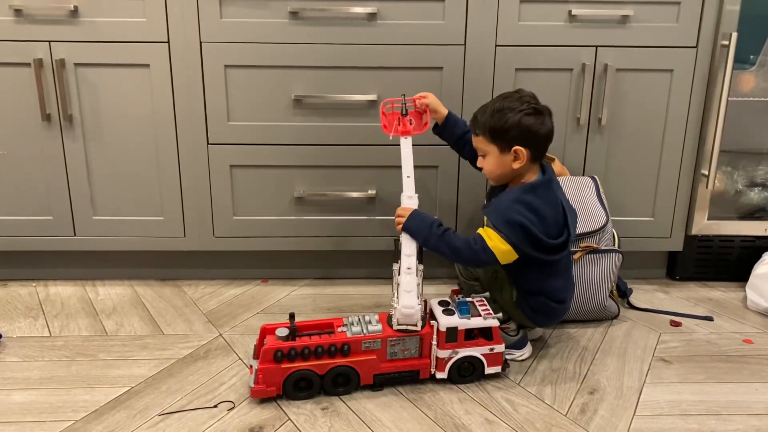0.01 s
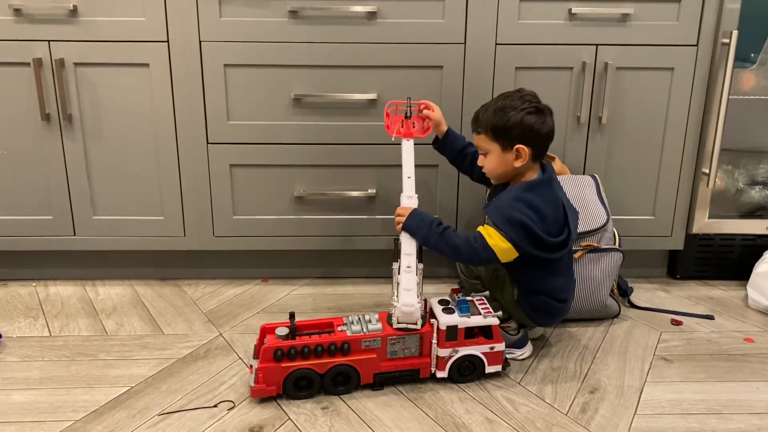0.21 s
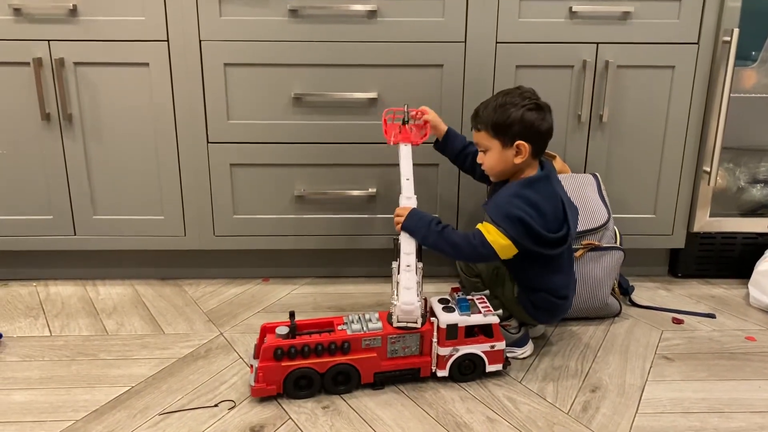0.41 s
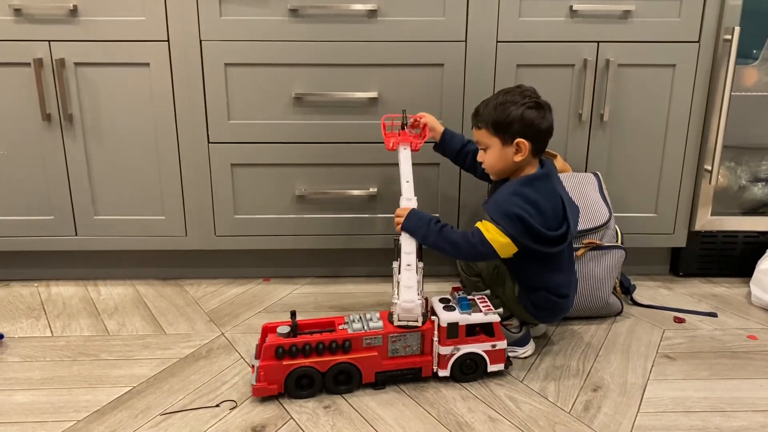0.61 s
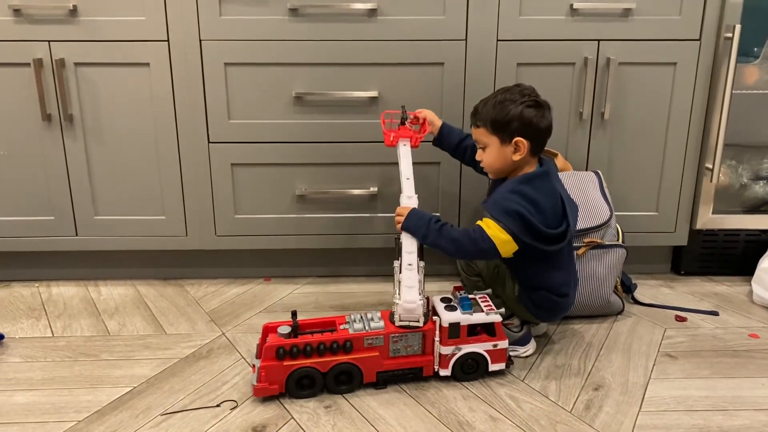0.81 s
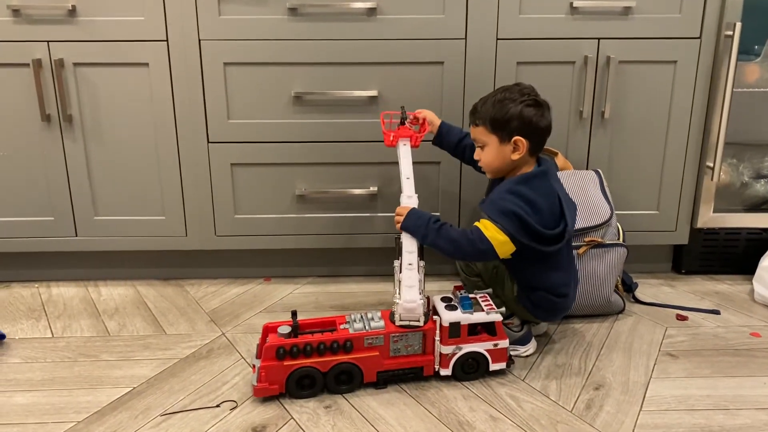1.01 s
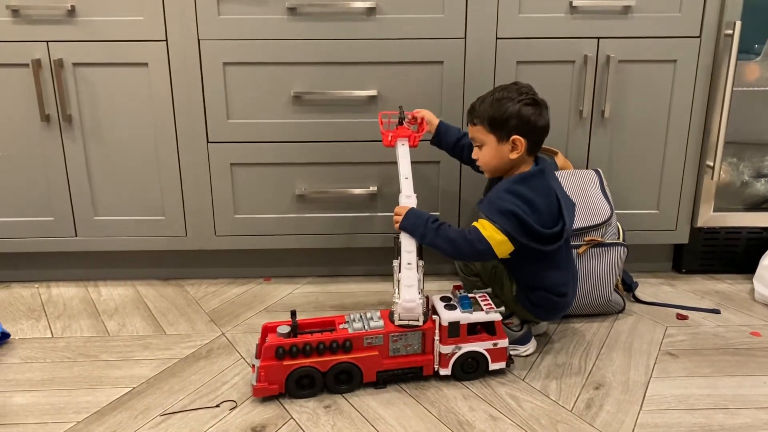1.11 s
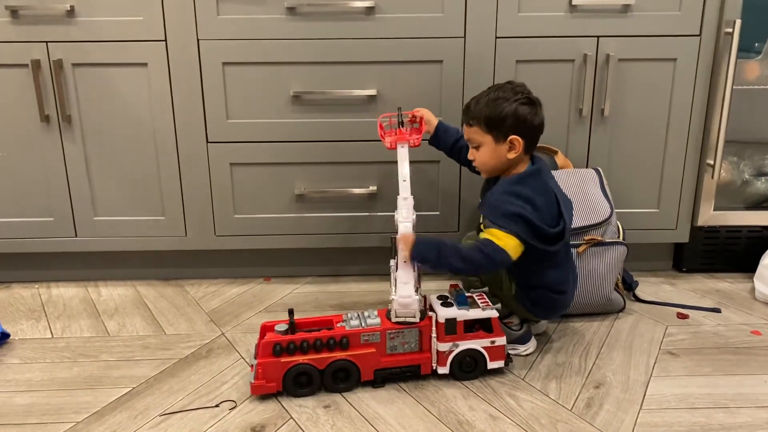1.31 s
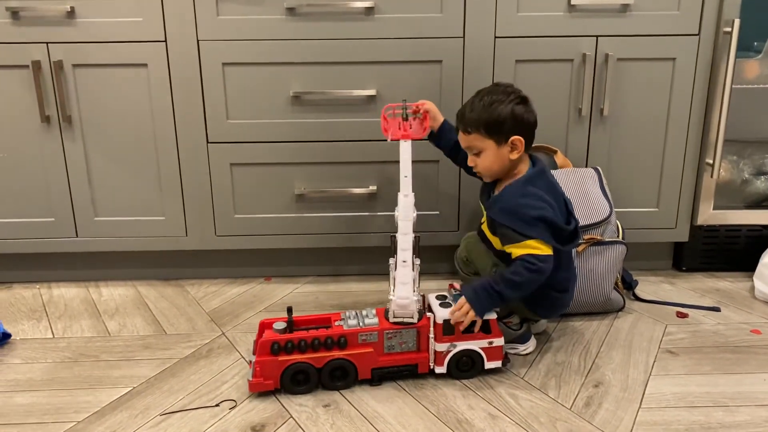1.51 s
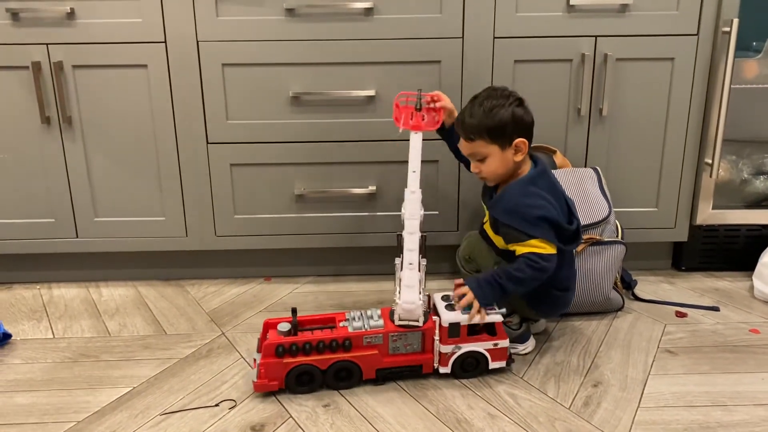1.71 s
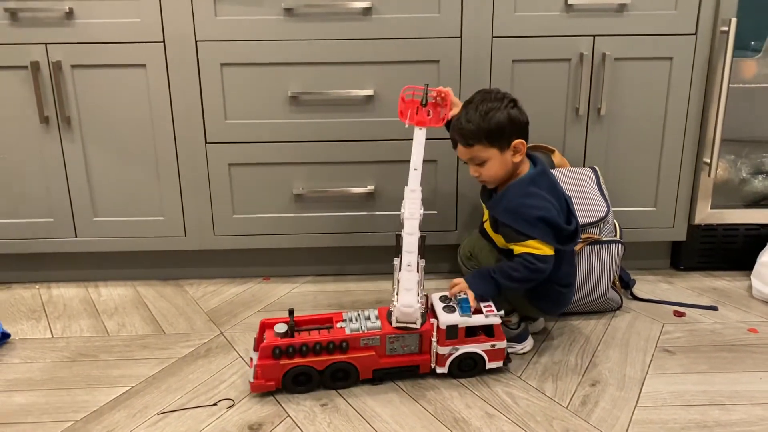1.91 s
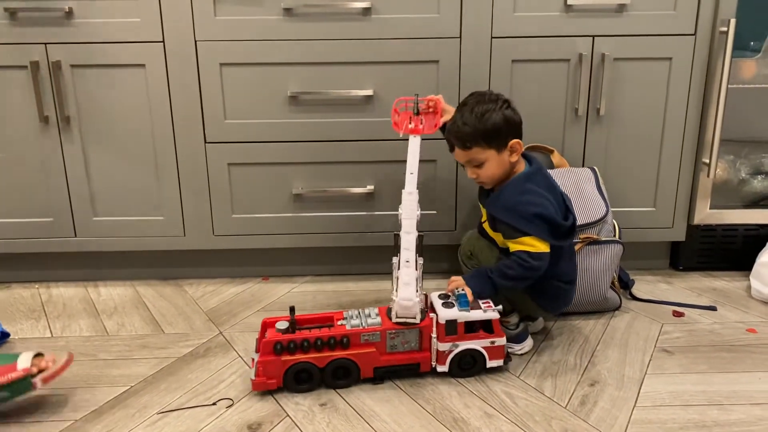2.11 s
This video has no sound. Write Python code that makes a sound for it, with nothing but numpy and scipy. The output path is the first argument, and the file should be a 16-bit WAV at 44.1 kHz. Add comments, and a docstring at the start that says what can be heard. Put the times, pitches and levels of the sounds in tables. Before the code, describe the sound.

A toy fire truck's plastic ladder, heard closely in a quiet, ringing kitchen. After faint room air, sharp clicks burst at 0.23 seconds, with scraping and scattered ticks until 0.82. The loudest clatter comes at 0.88-1.0. A click at 1.25 leads into dull hollow bumps and a brief floor drag until 1.5. Soft sleeve rustle follows, with a faint click at 1.97 and a weak bump near 2.13.

```python
"""Quiet room air, then a toy truck's plastic ladder clicks free, scrapes along its rails and clatters home.
The hollow truck body bumps and drags on the floor, and sleeves rustle as the child shifts.
Clicks are noise bursts and short sine rings; scrape, drag and cloth are showers of tiny random slips;
the body is a bank of decaying modes; air and rumble are coloured noise.
A hard, ringing kitchen answers all but the air and rumble, which are already diffuse."""
import sys
import numpy as np
from scipy import signal
from scipy.fft import rfft, irfft
from scipy.io import wavfile

SR = 44100
rng = np.random.default_rng(int(sys.argv[2]) if len(sys.argv) > 2 else 0)


def wav_out(sig):
    """Save sig, one row per channel (or a flat mono array), as 16-bit PCM at SR to the path in sys.argv[1]."""
    wavfile.write(sys.argv[1], SR, np.round(np.clip(np.atleast_2d(sig).T, -1, 1) * 32767).astype(np.int16))


N = 97020

# Catches and stops of the ladder: (time [s], snap level [dB], shell clack level [dB],
# direct path against room [dB], ring pitch of the struck part [Hz], ring level [dB])
LADDER_CLICKS = [(0.2338, -6, -8.5, -5, 5830, -24), (0.2382, -6, -10.5, -8, 5060, -12),
                 (0.2409, -29, -10.5, -1, 1180, -16.5), (.2522, -33, -14, 1.5, 1360, -12),
                 (.2620, -8, -13.5, -10, 4700, -15), (.2953, -19, -14, 0, 2620, -20),
                 (0.3422, -10, -23, 0, 2950, -19.5), (0.3722, -23, -13, 0, 2670, -19.5),
                 (.4022, -33, -18.5, 3, 3200, -28), (0.4504, -12, -16.5, 0.5, 5800, -19),
                 (0.4653, -28, -18, 1, 5700, -16.5), (0.483, -21, -25, 1, 5860, -23),
                 (0.531, -21.5, -36, 7.5, 7100, -34), (.5470, -36, -10.5, -3, 2220, -21),
                 (0.6273, -18, -25, -0.5, 4460, -41), (.6328, -20.5, -19, 0.5, 6100, -24),
                 (0.6617, -45, -21.5, 1, 4040, -43), (0.7428, -18.5, -19, -2, 2130, -19.5),
                 (.7520, -24, -12.5, -3, 3130, -19), (0.8158, -29, -10.5, -4, 2450, -19),
                 (.8188, -21, -24.5, 5.5, 5400, -33), (0.8842, -20, -17, -6, 4000, -24),
                 (0.9024, -1.5, -12, -4, 5300, -18), (.9055, -10, -6.5, -11, 2640, -9),
                 (0.9108, -10, -2.5, -10, 1850, -8.5), (0.9168, -12, -3.5, -8, 6060, -12),
                 (0.9311, -27, -13, -4, 2310, -14), (.9440, -5.5, -8.5, -17, 1060, -19.5),
                 (0.9557, -25, -11.5, -5, 1730, -7.5), (0.9785, -11, -7.5, -5, 1010, -18),
                 (1.0170, -9.5, -12.5, -2, 5440, -15), (1.0860, -14.5, -25, -3, 2340, -16),
                 (1.2457, -7.5, -15.5, -5, 2780, -31), (1.2506, -18.5, -18, 0, 5300, -15.5),
                 (1.4432, -30, -32, 2, 4150, -28.5), (1.9680, -35, -22.5, -3, 3050, -27)]
# Hollow bumps of the truck body: (time [s], level [dB], pitch the blow favours [Hz])
BODY_BUMPS = [(.241, -32, 403), (.392, -49, 390), (.549, -38, 278.6), (.557, -34, 167), (.822, -41, 640),
              (.925, -33, 180), (.943, -34, 440), (.990, -32, 292), (1.258, -36, 355), (1.274, -33, 395),
              (1.305, -41, 590), (1.322, -28.5, 355), (1.336, -41, 602), (1.354, -31, 356),
              (1.447, -35.5, 338), (1.450, -38, 1230), (1.508, -39.5, 380), (2.128, -41, 332),
              (2.165, -50, 130)]
# Modes of the truck body: (frequency [Hz], level [dB], T60 [s])
BODY_MODES = [(112, -10, 0.094), (183.3, 0, 0.077), (303.4, -3.5, 0.39), (358.2, -0.5, 0.088),
              (407.2, -8.5, 0.28), (447.5, -10.5, 0.14), (557, 0.5, 0.12), (641, 8.5, 0.031),
              (768, 10, 0.045), (1097, -19.5, 0.091), (1190, -33.5, .09), (1314, 6.5, 0.04)]
# Resonances of the ladder shell: (frequency [Hz], width [Hz], lift [dB])
SHELL_RESONANCES = [(424, 58, 7), (700, 110, 1), (1013, 12, 6.5), (1225, 116, 8.5), (1650, 110, 1),
                    (2040, 280, 3.5), (2420, 23, 2), (2620, 470, 2), (4255, 110, 1.5)]

# Tone of the snapping catches: (frequency [Hz], relative level [dB])
SNAP_COLOUR = [(100, -30), (700, -28), (2000, -11.5), (4000, 0.5), (6300, 1.5), (8000, -1), (11000, 0),
               (16000, -14)]
# Tone of the clacking shell: (frequency [Hz], relative level [dB])
CLACK_COLOUR = [(60, -20), (200, -13.5), (400, 3), (800, -1), (1500, -0.5), (2700, 1), (5000, -2),
                (8000, -5.5), (16000, -9)]
# Tone of the rails scraping: (frequency [Hz], relative level [dB])
SCRAPE_COLOUR = [(60, -14.5), (220, -3), (400, -0.5), (800, 0), (1500, -3), (2700, -2), (5000, -3.5),
                 (7500, -4.5), (11000, -8), (16000, -36)]
# Tone of the brushing cloth: (frequency [Hz], relative level [dB])
CLOTH_COLOUR = [(60, -25), (350, 5), (700, 2), (1500, -1.5), (3000, -2), (5000, -1.5), (7500, -3.5),
                (11000, -5), (16000, -12.5)]
# Tone of the truck dragging: (frequency [Hz], relative level [dB])
DRAG_COLOUR = [(80, -14), (260, -6), (365, 4.5), (470, -5), (620, -2), (800, -7.5), (1100, -2), (1600, -18),
               (4000, -22), (16000, -66)]
# Tone of the handling rumble: (frequency [Hz], relative level [dB])
RUMBLE_COLOUR = [(20, -42), (35, -12), (55, -3.5), (110, 7.5), (170, -3.5), (300, -13.5), (1000, -58),
                 (16000, -81)]
# Tone of the room air: (frequency [Hz], relative level [dB])
AIR_COLOUR = [(20, -32), (50, -0.5), (100, -8.5), (150, -8), (330, -11.5), (480, -20), (1200, -27.5),
              (2400, -29.5), (5000, -33.5), (16000, -33.5)]

# Strength of the ladder's sliding: (time [s], level [dB])
SLIDE_LEVEL = [(.19, -63.5), (.228, -43.5), (.25, -37), (.32, -48), (.39, -40.5), (.44, -43.5), (.51, -40),
               (.565, -58), (.59, -51), (.72, -55), (.76, -50), (.805, -81), (.835, -39.5), (.875, -46),
               (.897, -26.5), (.93, -33), (.985, -42), (1.05, -76), (1.22, -55.5), (1.5, -64)]
# Strength of the truck's dragging on the floor: (time [s], level [dB])
DRAG_LEVEL = [(1.23, -71), (1.27, -46), (1.335, -42.5), (1.375, -58), (1.435, -65), (1.45, -39),
              (1.48, -60), (1.55, -58.5), (1.7, -71.5)]
# Strength of the sleeve rustle: (time [s], level [dB])
RUSTLE_LEVEL = [(1.35, -62.5), (1.5, -54.5), (1.58, -60), (1.63, -52.5), (1.69, -55), (1.81, -46.5),
                (1.88, -54), (1.98, -50), (2.09, -50.5), (2.2, -51)]
# Strength of the handling rumble: (time [s], level [dB])
RUMBLE_LEVEL = [(.18, -88), (.27, -51), (.56, -55.5), (.7, -63.5), (.82, -55.5), (.92, -52), (1.09, -47.5),
                (1.22, -67), (1.45, -57), (1.7, -71.5), (2.12, -65.5), (2.18, -49.5)]

# Decay of the kitchen reflections: (frequency [Hz], T60 [s])
ROOM_DECAY = [(100, 0.84), (400, 0.54), (1000, 0.56), (2500, 0.49), (5000, 0.48), (10000, 0.21),
              (16000, 0.43)]
# Stereo width of a diffuse sound: (frequency [Hz], side minus mid [dB])
STEREO_WIDTH = [(50, -18), (130, -11.5), (300, -11), (550, -9), (1100, -6.5), (1750, 4), (2400, -7),
                (3300, -1), (4300, -6), (5200, 2.5), (7000, -9), (16000, -30)]
# Lean of the microphone pair: (frequency [Hz], left minus right [dB])
LEFT_LEAN = [(60, .3), (150, .4), (330, 1.5), (600, 4.5), (1100, 0), (2300, 0.2), (4500, 1.4), (12000, -2)]
# Phase by which left leads right: (frequency [Hz], phase [radians])
LEFT_PHASE = [(100, 0.022), (500, 0.79), (1000, 1.48), (1500, 2), (2100, 0.47), (3300, 0.91), (3700, -0.72),
              (4500, 0.028)]

# Decay constants, and the chatter's level against the sharp contact
SNAP_S, SNAP_CHATTER_DB = 0.00047, -8.5
CLACK_S, CLACK_CHATTER_DB = 0.0026, -4
CHATTER_S, RING_T60_S = 0.0054, 0.012

# Width of the favoured modes, floor for the others, time constant of the rise, room level
FAVOUR_OCTAVES, OTHER_MODES_DB, BUMP_RISE_S, BUMP_ROOM_DB = 0.1, -22.5, 0.0018, -8.5

# Average slip rate, unevenness of size, direct path against the room
SLIPS_PER_S, SLIP_SPREAD_DB, SLIDE_DIRECT_DB = 1500, 3.5, -8
JUDDERS_PER_S, JUDDER_SPREAD_DB, DRAG_DIRECT_DB = 500, 3, 3.5
FIBRES_PER_S, FIBRE_SPREAD_DB, CLOTH_DIRECT_DB = 5000, 3.5, 0

AIR_DB = -58
ROOM_GAP_S, ROOM_BUILD_S = 0.0034, 0.0016  # silence before the reflections, then their fade-in
# Rate at which two sets of reflections trade places, to smooth the room's tone
TAILS_TRADE_HZ = 3.3
COMB_FROM_HZ, COMB_PERIOD_HZ, COMB_FADE_HZ = 6793, 4340, 500  # treble turning in and out of phase
EDGE_HZ = 16050  # top of the band


def ladder():
    """Catches snap, the shell clacks, struck parts ring briefly and the rails scrape in stick and slip."""
    _, snap_db, clack_db, _, ring_hz, ring_db = np.transpose(LADDER_CLICKS)
    snaps = contacts(bursts(SNAP_S, SNAP_CHATTER_DB), snap_db)
    snaps = colour(snaps, SNAP_COLOUR, SHELL_RESONANCES)
    clacks = contacts(bursts(CLACK_S, CLACK_CHATTER_DB), clack_db)
    clacks = colour(clacks, CLACK_COLOUR, SHELL_RESONANCES)

    t = np.arange(SR // 20) / SR
    ring_decay = np.exp(-np.log(1000) * t / RING_T60_S)
    rings = contacts(np.sin(2 * np.pi * ring_hz[:, None] * t) * ring_decay, ring_db)

    scrape = friction(SLIDE_LEVEL, SLIPS_PER_S, SLIP_SPREAD_DB, SLIDE_DIRECT_DB)
    scrape = colour(scrape, SCRAPE_COLOUR, SHELL_RESONANCES)
    return snaps + clacks + rings + scrape


def bursts(decay_s, chatter_db, size=1024):
    """One noise burst per click: a sharp contact that dies fast over chatter that dies at its own pace."""
    t = np.arange(size) / SR
    envelope = np.exp(-t / decay_s) + amp(chatter_db) * np.exp(-t / CHATTER_S)
    return envelope * rng.standard_normal((len(LADDER_CLICKS), size))


def contacts(sounds, levels_db):
    """Plays one sound at each click, heard directly and through the room's reflections."""
    near, far = np.zeros(N), np.zeros(N)
    for (s, _, _, direct_db, _, _), sound, db in zip(LADDER_CLICKS, sounds, levels_db):
        hit = amp(db) * sound / np.linalg.norm(sound)
        add(far, s, hit)
        add(near, s, amp(direct_db) * hit)
    return direct(near) + kitchen(far)


def truck():
    """Each bump excites the hollow body's modes near the favoured pitch; dragging makes it judder."""
    t = np.arange(SR // 3) / SR
    hz, db, t60 = np.transpose(BODY_MODES)[:, :, None]
    decay = np.exp(-np.log(1000) * t / t60)
    rise = 1 - np.exp(-t / BUMP_RISE_S)
    rings = amp(db) * decay * np.sin(2 * np.pi * hz * t) * rise

    bumps = np.zeros(N)
    mode_signs = rng.choice([-1, 1], (len(BODY_BUMPS), len(BODY_MODES), 1))
    for (s, blow_db, favoured_hz), signs in zip(BODY_BUMPS, mode_signs):
        octaves_away = np.log2(hz / favoured_hz)
        weight = np.exp(-(octaves_away / FAVOUR_OCTAVES) ** 2)
        weight = np.maximum(weight, amp(OTHER_MODES_DB))
        bump = (signs * weight * rings).sum(0) / np.linalg.norm(weight)
        add(bumps, s, amp(blow_db) * bump)

    drag = friction(DRAG_LEVEL, JUDDERS_PER_S, JUDDER_SPREAD_DB, DRAG_DIRECT_DB)
    return bumps + amp(BUMP_ROOM_DB) * kitchen(bumps) + colour(drag, DRAG_COLOUR)


def sleeves():
    """Cloth brushes over cloth and plastic, its fibres catching and letting go in dense tiny slips."""
    rustle = friction(RUSTLE_LEVEL, FIBRES_PER_S, FIBRE_SPREAD_DB, CLOTH_DIRECT_DB)
    return colour(rustle, CLOTH_COLOUR)


def friction(curve, per_s, spread_db, direct_db):
    """Tiny random slips of uneven size and either sign follow the stroke's strength, heard in the room."""
    sizes = amp(spread_db * np.minimum(rng.exponential(1, N), 4))
    signs = rng.choice([-1, 1], N)
    happens = rng.random(N) < per_s / SR
    slips = unit(sizes * signs * happens) * level(curve)
    near = amp(direct_db) * direct(slips)
    return (near + kitchen(slips)) / np.hypot(1, amp(direct_db))


def background():
    """Diffuse coloured noise: steady quiet room air and the swelling low rumble of handling."""
    air = unit(colour(diffuse(rng.standard_normal((2, N))), AIR_COLOUR))
    rumble = unit(colour(diffuse(rng.standard_normal((2, N))), RUMBLE_COLOUR))
    return amp(AIR_DB) * air + level(RUMBLE_LEVEL) * rumble


def kitchen(x):
    """Dense reflections from floor and cabinets, two sets trading places, each band dying at its own speed."""
    turn = 2 * np.pi * TAILS_TRADE_HZ * np.arange(N) / SR
    out = 0
    for share in (np.cos(turn), np.sin(turn)):
        echoes = rng.standard_normal((2, SR)) * (rng.random((2, SR)) < .15)
        hz, t, bands = signal.stft(diffuse(echoes), SR, nperseg=256)
        decay = amp(-60 * t / read(ROOM_DECAY, hz)[:, None])
        tail = signal.istft(bands * decay, SR, nperseg=256)[1]
        tail_t = np.arange(tail.shape[1]) / SR
        tail = tail * np.clip((tail_t - ROOM_GAP_S) / ROOM_BUILD_S, 0, 1)
        tail = tail / np.sqrt(np.sum(tail ** 2) / 2)
        out = out + signal.fftconvolve((share * x)[None], tail, axes=1)[:, :N]
    return out


def diffuse(pair):
    """Turns two unrelated signals into a diffuse field at the two microphones."""
    mid, side = rfft(pair)
    width = amp(read(STEREO_WIDTH, np.fft.rfftfreq(pair.shape[1], 1 / SR)))
    spectra = np.array([mid + width * side, mid - width * side])
    return irfft(spectra / np.sqrt(1 + width ** 2), pair.shape[1])


def direct(x):
    """The straight path reaches both microphones alike."""
    return np.array([x, x])


def colour(x, points, peaks=(), size=4096):
    """Causal minimum-phase filter of energy 1, shaped by a tone curve and its resonances."""
    hz = abs(np.fft.fftfreq(size, 1 / SR))
    db = read(points, hz)
    for f, width, lift in peaks:
        db = db + lift / (1 + (2 * (hz - f) / width) ** 2)
    spectrum = np.exp(np.conj(signal.hilbert(np.log(amp(db)))))
    taps = np.fft.ifft(spectrum).real[:size // 2]
    return signal.fftconvolve(x, taps[None] / np.linalg.norm(taps), axes=1)[:, :N]


def amp(db):
    """Decibels to gain."""
    return 10 ** (np.asarray(db) / 20)


def unit(x):
    """Scales to rms 1."""
    return x / np.sqrt(np.mean(x ** 2) + 1e-20)


def read(points, hz):
    """Reads a table on a log-frequency axis."""
    f, value = np.transpose(points)
    return np.interp(np.log(hz + 1), np.log(f + 1), value)


def level(points):
    """Gain over time from (time [s], level [dB]) points, all but silent before the first."""
    s, db = np.transpose(points)
    return amp(np.interp(np.arange(N) / SR, s, db, left=-120))


def add(mix, s, sound):
    """Mixes a sound in at a time in seconds."""
    part = mix[max(round(s * SR), 0):][:len(sound)]
    part += sound[:len(part)]


def scene():
    """Everything that sounds in the kitchen."""
    return ladder() + truck() + sleeves() + background()


def record(dry):
    """A close microphone pair: level and phase lean by band, treble phase turns, and the top is cut."""
    hz = np.fft.rfftfreq(N, 1 / SR)
    # Each channel takes half of the level and phase difference
    lean = amp(read(LEFT_LEAN, hz) / 2) * np.exp(.5j * read(LEFT_PHASE, hz))
    left, right = rfft(dry) * np.array([lean, 1 / lean])

    angle = np.pi * np.maximum(hz - COMB_FROM_HZ, 0) / COMB_PERIOD_HZ
    mid, side = np.cos(angle) * left, 1j * np.sin(angle) * right
    turned = np.array([mid - side, mid + side])
    treble = np.clip(1 + (hz - COMB_FROM_HZ) / COMB_FADE_HZ, 0, 1)
    heard = irfft((1 - treble) * np.array([left, right]) + treble * turned, N)

    low_pass = signal.firwin(301, EDGE_HZ, window=("kaiser", 9), fs=SR)
    return signal.oaconvolve(heard, low_pass[None], "same")


dry = scene()
out = record(dry)
wav_out(out)
```